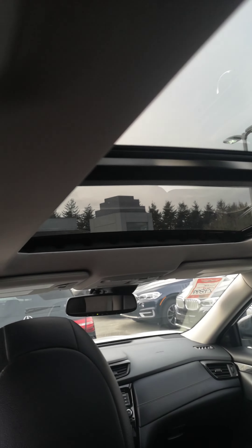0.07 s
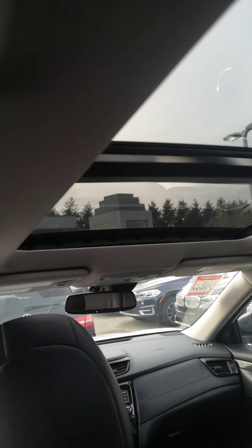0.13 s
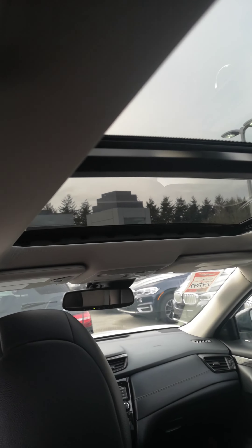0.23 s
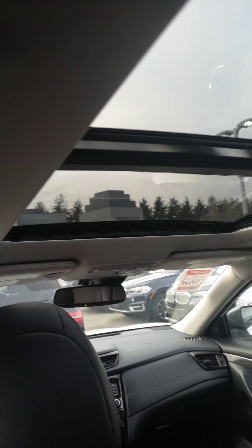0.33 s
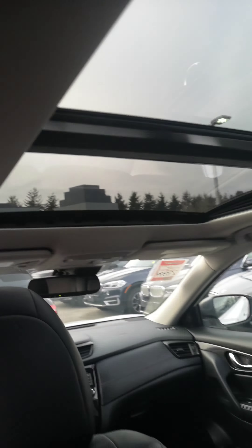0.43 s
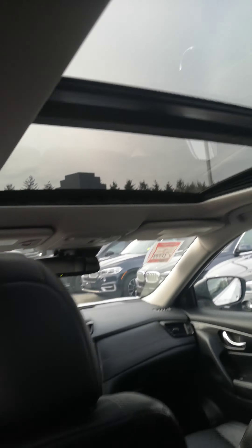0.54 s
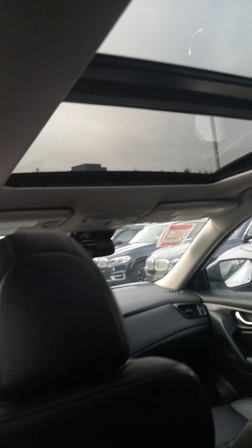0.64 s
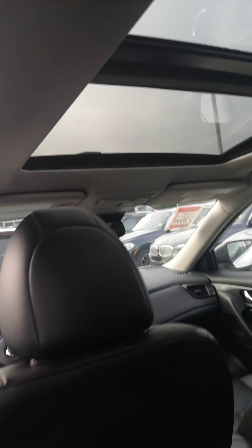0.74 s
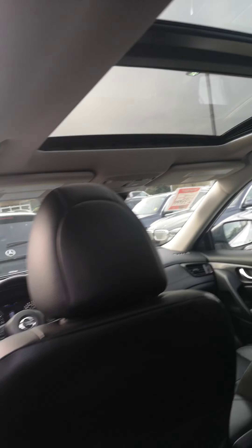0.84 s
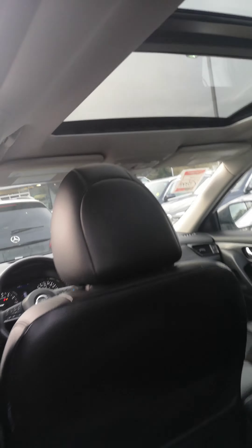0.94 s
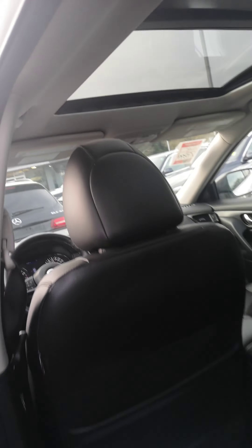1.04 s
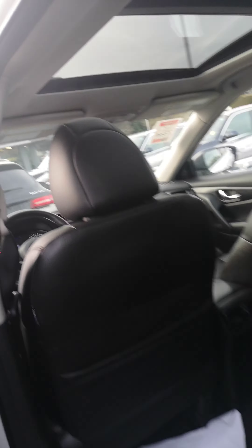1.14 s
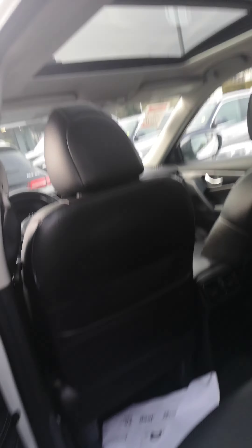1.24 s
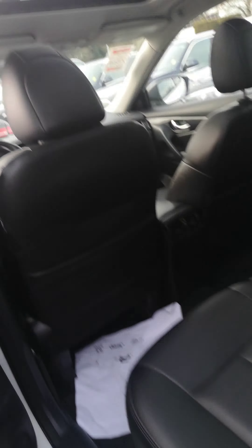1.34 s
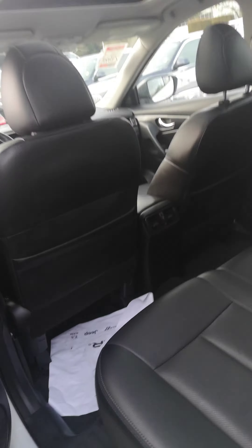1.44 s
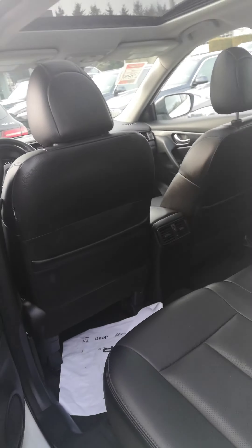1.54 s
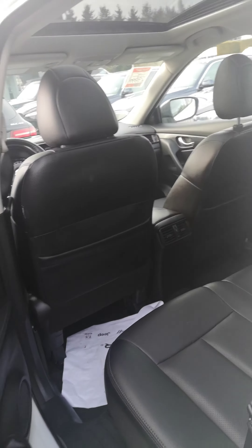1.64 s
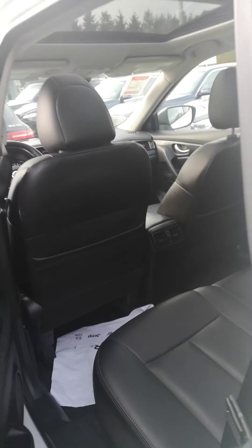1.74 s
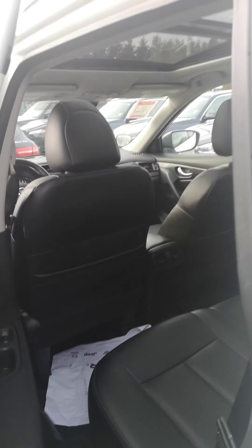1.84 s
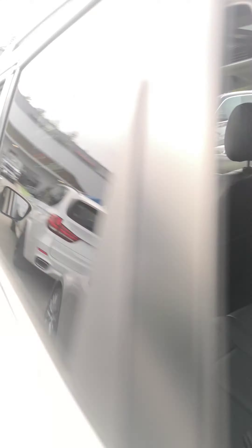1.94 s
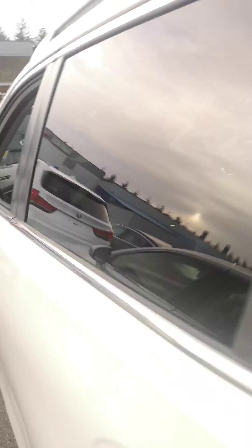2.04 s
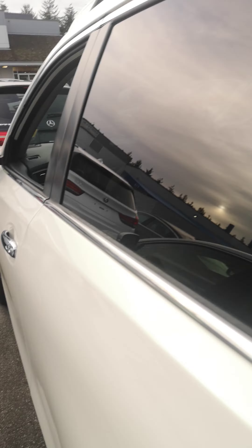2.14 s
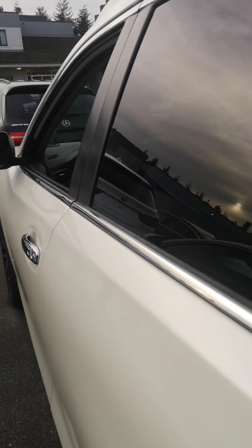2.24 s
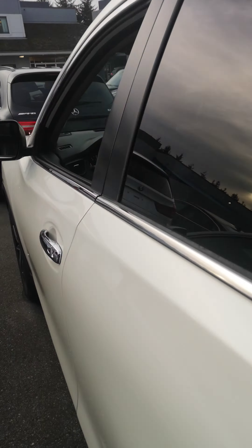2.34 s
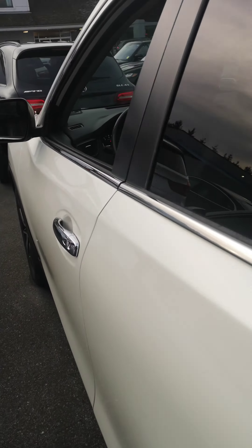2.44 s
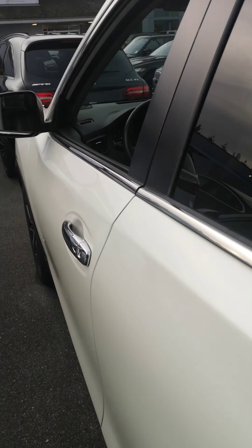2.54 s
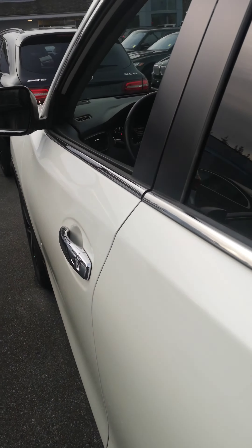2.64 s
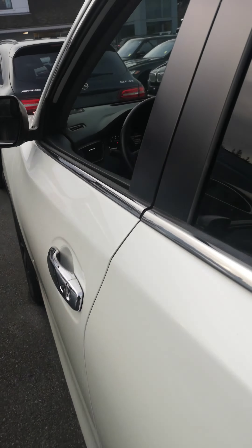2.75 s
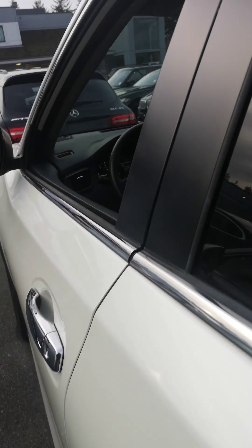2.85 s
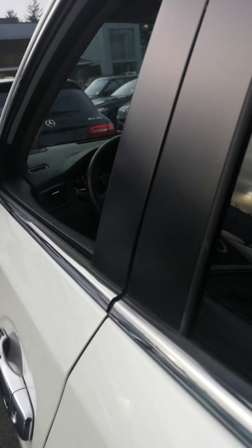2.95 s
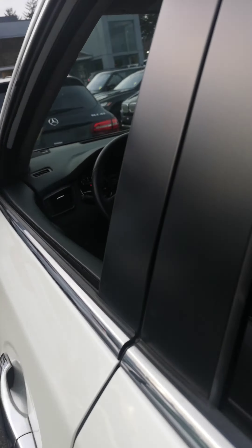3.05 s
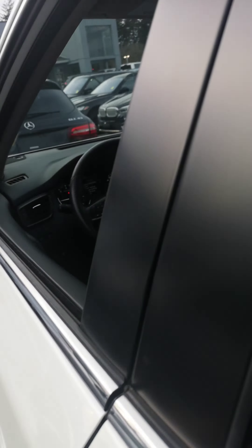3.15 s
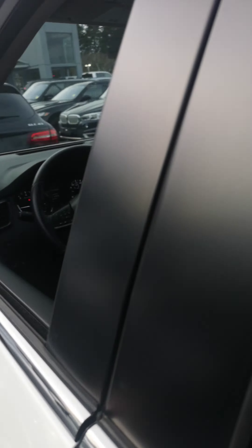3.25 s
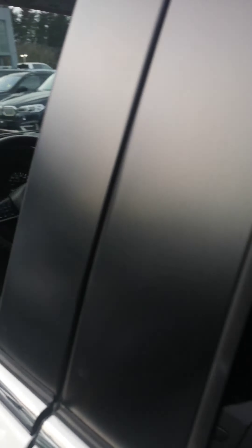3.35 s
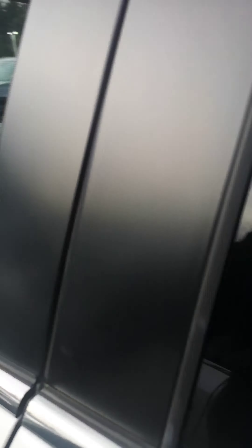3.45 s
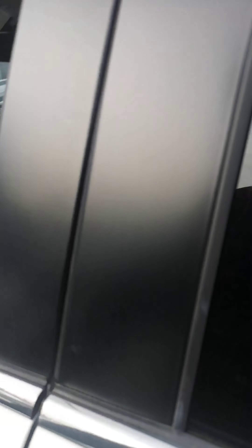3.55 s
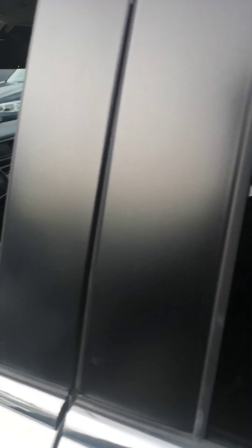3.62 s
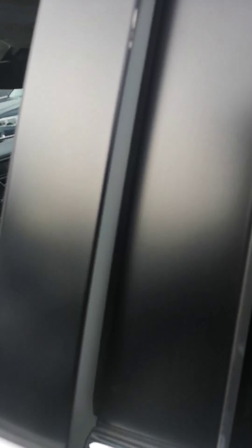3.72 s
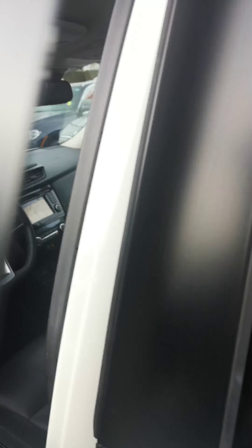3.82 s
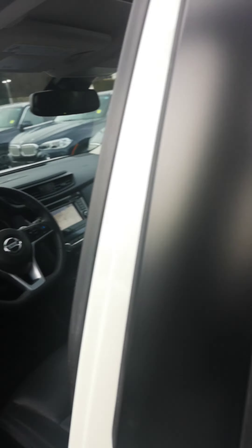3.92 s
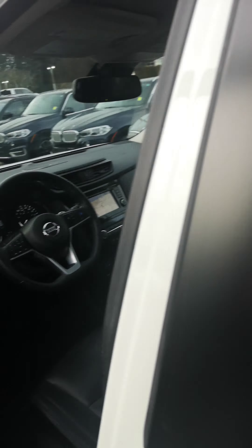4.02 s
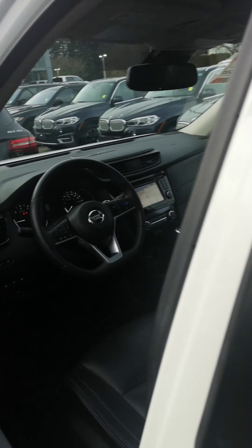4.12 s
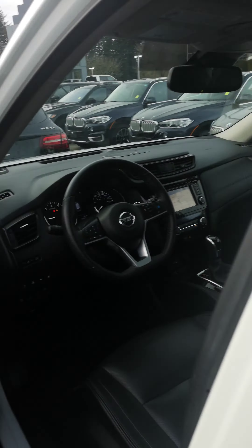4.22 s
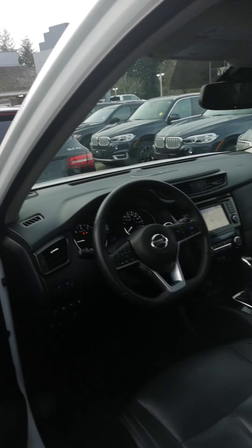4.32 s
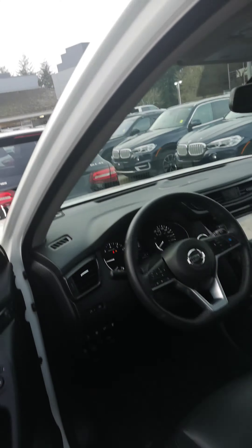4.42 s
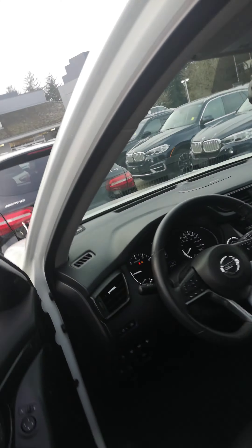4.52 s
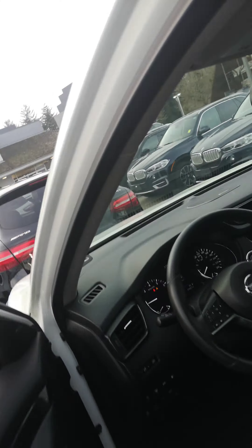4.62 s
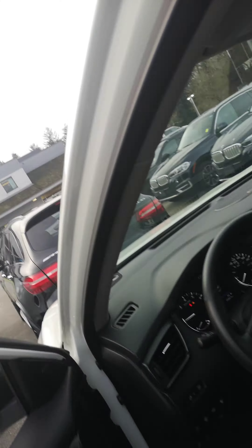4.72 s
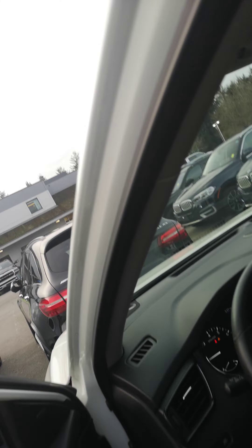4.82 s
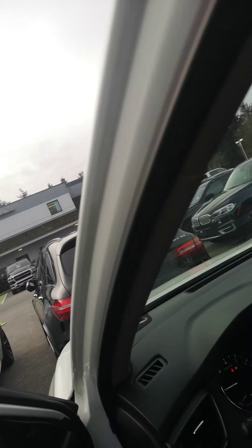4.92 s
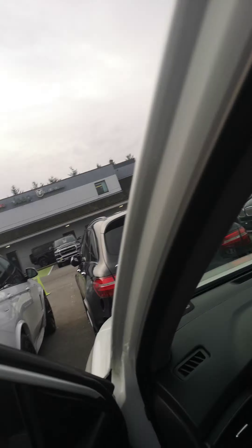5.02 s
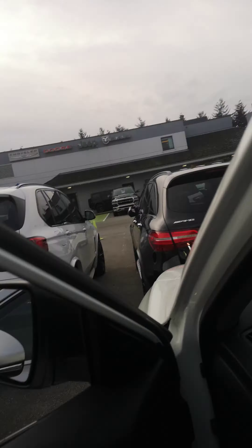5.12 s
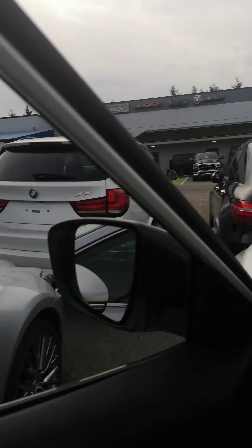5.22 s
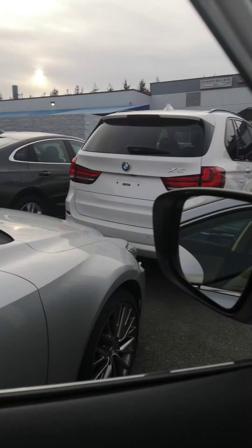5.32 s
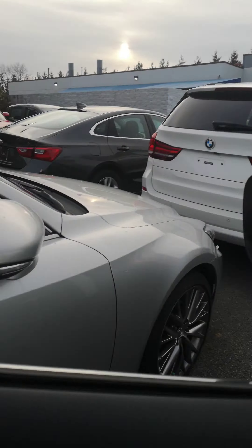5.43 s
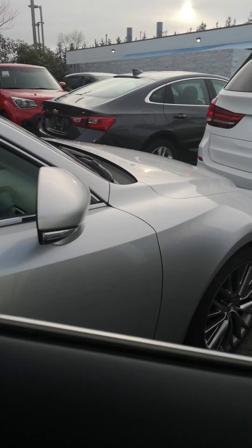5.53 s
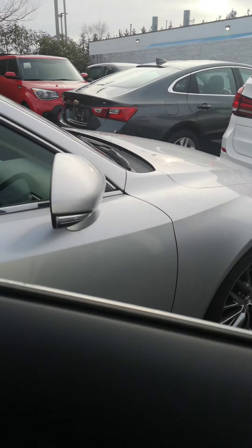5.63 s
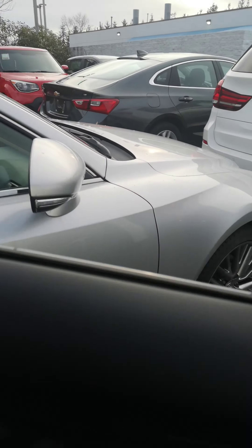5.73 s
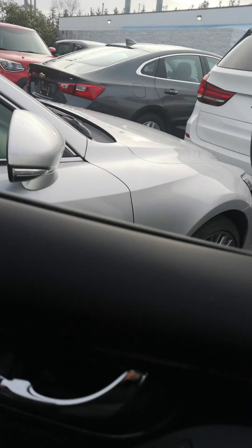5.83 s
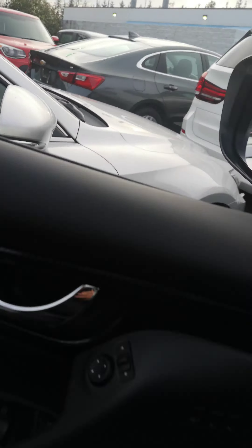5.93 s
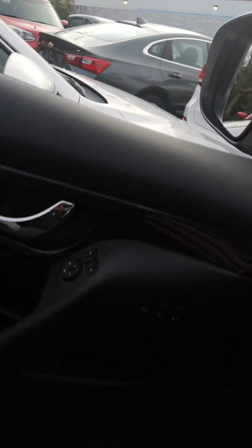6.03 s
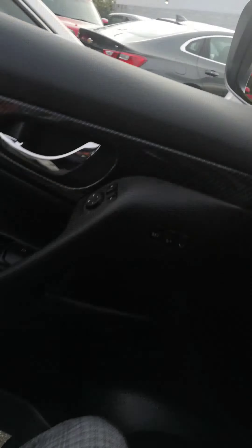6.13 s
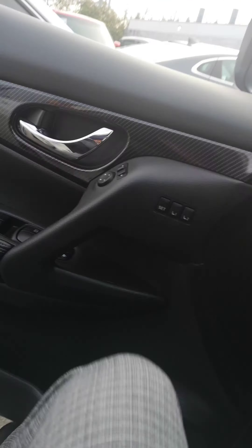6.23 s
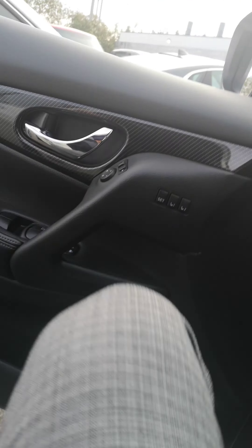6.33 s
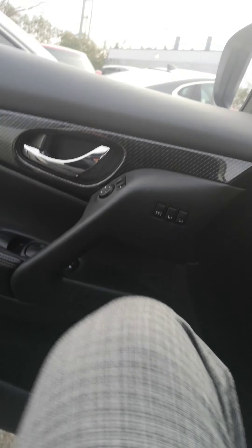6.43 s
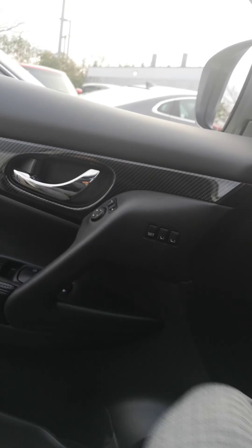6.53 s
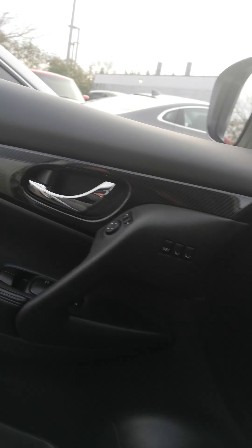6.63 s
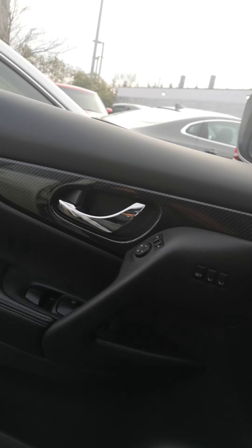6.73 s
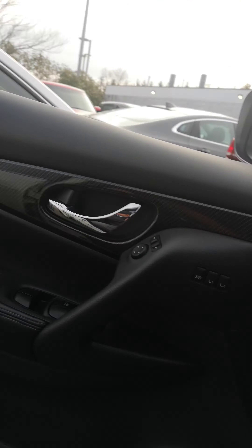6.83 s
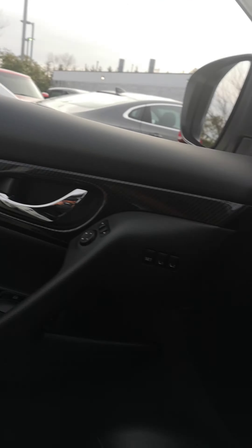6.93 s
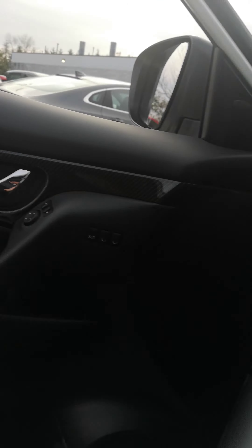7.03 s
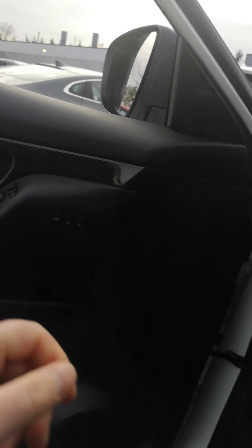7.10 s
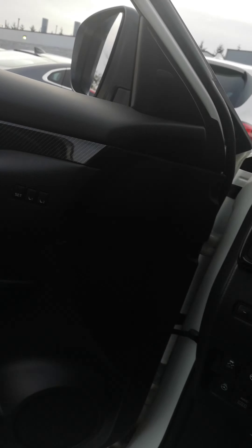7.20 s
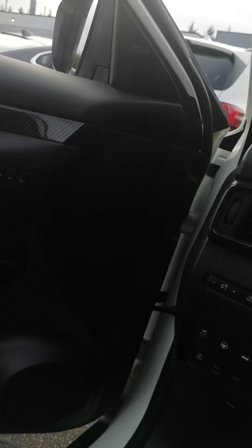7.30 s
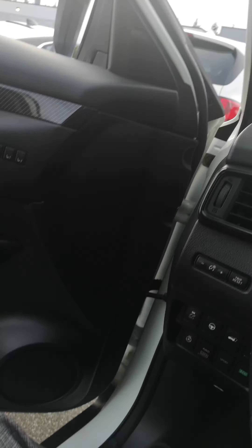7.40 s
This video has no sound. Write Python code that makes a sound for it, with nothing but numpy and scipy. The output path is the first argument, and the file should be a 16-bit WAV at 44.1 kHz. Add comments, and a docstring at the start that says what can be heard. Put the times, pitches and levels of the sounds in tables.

```python
"""Car door slam in a lot

A rear door slams close to the microphone: rows of contacts ring body and latch modes, with seal and clatter noise.
The front door's handle clicks, its latch lets go and the door swings through its stop (struck modes, noise bursts).
Someone slides onto the seat and bumps the trim: rubbed noise, creaking slips, more knocks.
Under it all: wavering engine tones, a fan's fuzzy whine and shaped open-air noise.
"""
import sys
import numpy as np
from scipy import signal
from scipy.fft import rfft, irfft, next_fast_len
from scipy.io import wavfile

SR = 44100
rng = np.random.default_rng(int(sys.argv[2]) if len(sys.argv) > 2 else 0)


def unload_audio(sound):
    """Save the sound as a 16-bit wav file, at the path given as the first command line argument."""
    columns = np.transpose(np.atleast_2d(sound))
    # keep every value between -1 and 1, then stretch to whole-number steps
    steps = np.round(np.clip(columns, -1, 1) * 32767)
    wavfile.write(sys.argv[1], SR, steps.astype(np.int16))


N = 329162
TIME_S = np.arange(N) / SR
AGE_S = TIME_S[:SR]  # time since a blow

# Spectra and mode levels are relative; the sources set the final level.
# open air at the microphone: [time_s, relative_level_db]
LOT_LEVEL = [(0.0, -63.5), (0.39, -66), (1.12, -62.5), (1.35, -59), (1.64, -60.5), (1.97, -60),
             (2.3, -55.5), (2.78, -55.5), (3.37, -57.5), (3.72, -56.5), (3.84, -59), (4.09, -60.5),
             (4.45, -58.5), (4.67, -60.5), (6.63, -60), (6.84, -57.5), (7.46, -59)]
# low rumble of the open air and the rocking car body: [freq_hz, density_db_per_hz]
RUMBLE_SPECTRUM = [(8, -6.5), (25, 2.5), (55, 0), (90, -9), (180, -8.5), (280, -15.5), (420, -19.5),
                   (700, -24), (1100, -25), (2000, -49)]
# high open-air noise: [freq_hz, density_db_per_hz]
HISS_SPECTRUM = [(300, -19), (900, 6), (1200, -2), (1330, 5), (1500, 1.5), (1850, 4.5), (2050, 3),
                 (2400, 4.5), (3300, -1), (4200, 2), (5000, 1), (6100, 1.5), (7050, 7), (7500, -0.5)]

# exhaust throb: [time_s, level_db]
THROB_LEVEL = [(0, -46), (4.6, -41), (7.46, -40)]
# engine tones, louder in an open doorway: [time_s, level_db]
DRONE_LEVEL = [(0, -51.5), (.8, -53.5), (1.8, -43), (2.8, -50), (4.5, -51), (5.6, -53.5), (6.4, -48.5),
               (7.46, -46)]
# engine tones: [pitch_hz, level_db]
DRONE_LINES = [(78, -7.5), (118, -11.5), (156.3, -3.5), (194.3, 0), (236.5, -9)]
# overtones of the drone: [time_s, level_db]
OVERTONE_LEVEL = [(0, -58), (2, -64), (7.46, -59.5)]
# overtones of the drone: [pitch_hz, level_db]
OVERTONE_LINES = [(279, -8), (319, 0), (360, -5)]

# upper whine of the cooling fan: [time_s, pitch_hz]
FAN_PITCH = [(0, 800), (1.5, 821.4), (2.85, 810), (3.4, 822.6), (4.4, 802), (5.6, 787), (7.46, 794)]
# upper whine: [time_s, level_db]
FAN_UPPER_LEVEL = [(0, -64), (1, -69), (1.5, -60.5), (2.1, -67), (2.8, -52.5), (3.5, -57.5), (5.5, -58.5),
                   (6.2, -52.5), (6.8, -64.5)]
# lower whine: [time_s, level_db]
FAN_LOWER_LEVEL = [(0, -69), (5.1, -65), (5.5, -62), (7.46, -58.5)]

# clothes over the seats, a sole over the ground: [start_s, length_s, level_db, centre_hz, width_hz]
RUSTLES = [(1.048, 0.48, -68, 1890, 700), (1.099, .48, -69, 4200, 600), (4.266, 0.19, -62, 5760, 1200),
           (4.459, 0.22, -56.5, 2030, 400), (4.522, .16, -56, 1020, 300), (5.371, 0.058, -57, 1550, 700),
           (5.489, 0.054, -56, 3800, 2500), (5.758, 0.061, -59, 1980, 900), (6.631, .2, -57, 970, 250),
           (6.763, 0.27, -62.5, 1580, 130), (7.312, 0.17, -55.5, 4800, 2500)]
# slip of the seat's upholstery: [freq_hz, density_db_per_hz]
CREAK_SPECTRUM = [(700, -25), (1600, -1.5), (2400, 2), (3200, 2), (3800, -11), (4800, 2), (5600, -13),
                  (7500, -6.5)]
# hard plastic and the catch: [start_s, level_db, centre_hz]
CLICKS = [(1.616, -47, 5200), (2.982, -41, 6000), (3.024, -38.5, 6040), (3.735, -31, 6900),
          (3.767, -34, 2970), (5.505, -48, 3800), (6.735, -43.5, 3200), (7.23, -41, 2300),
          (7.2653, -38, 1600)]

# latch, door stop, shoes and trim: [start_s, ring_db, ring_hz, thud_db, snap_db]
KNOCKS = [(1.4722, -43.5, 700, -46, -48), (3.647, -38, 330, -38, -41), (3.7209, -35, 250, -21.5, -32.5),
          (3.729, -23, 226, -28, -45), (3.7318, -18, 575, -28, -29), (3.741, -24.5, 155, -35, -37),
          (3.758, -28.5, 80, -45, -57), (4.105, -50, 200, -46, -40.5), (4.1235, -44, 1200, -46, -42),
          (4.127, -30, 980, -34, -25.5), (4.129, -27, 407, -38, -31), (4.14, -25.5, 182, -44, -37),
          (4.405, -44, 292, -40, -62), (4.641, -39.5, 490, -46, -60), (5.03, -53, 472, -43, -62),
          (5.378, -42, 507, -44, -53), (6.6345, -20.5, 135, -27, -39.5), (6.638, -24.5, 336, -36, -60),
          (6.662, -34.5, 392, -40, -60), (6.686, -39, 634, -44, -64), (6.705, -27, 135, -32.5, -41),
          (6.731, -21.5, 118, -40, -50), (6.762, -29, 280, -36, -51), (6.7817, -33.5, 330, -31.5, -37),
          (7.146, -28, 138, -39, -60), (7.229, -34, 187, -38, -37.5), (7.2642, -34.5, 338, -42, -44),
          (7.298, -33, 183, -37.5, -50)]
# padded contact: [freq_hz, density_db_per_hz]
THUD_SPECTRUM = [(30, -21), (100, 11.5), (300, 3.5), (600, -3), (1000, -11), (1600, -43.5), (3000, -32),
                 (7000, -28)]
# hard contact: [freq_hz, density_db_per_hz]
SNAP_SPECTRUM = [(100, -10), (600, -27.5), (1200, 5.5), (2000, 2.5), (3500, -5), (5500, -3), (7200, -1.5)]
# front door rattling on after its latch and its stop: [start_s, level_db]
SHAKES = [(3.735, -31), (4.13, -37)]
# rattling front door: [freq_hz, density_db_per_hz]
SHAKE_SPECTRUM = [(40, -10), (180, 9), (300, 0), (600, 3.5), (1000, -1), (1500, -16), (3000, -18.5),
                  (7200, -24)]

# handle at its stop: [pitch_hz, level_db, t60_s]
HANDLE_MODES = [(3840, -18, 0.011), (6760, -24, 0.011)]
# handle spring, pulled and let go: [loudest_tick_s, level_db, spread_s]
CHATTER = [(3.6205, -34.5, 0.0055), (3.641, -41, 0.02), (3.8393, -34.5, 0.015)]
# resonances of the spring: [centre_hz, width_hz, level_db]
SPRING_BANDS = [(2400, 1200, -8), (4500, 700, -1), (7040, 1100, -7)]

# contacts of seal, latch and rattling trim: [start_s, push_db, clatter_db, clatter_t60_s]
SLAM_CONTACTS = [(2.1186, -36, -17.5, 0.044), (2.1242, -13.5, -9.5, 0.063), (2.1287, -6, -13, 0.063),
                 (2.1402, -31.5, -25.5, 0.054), (2.1448, -14, -12.5, 0.03), (2.1511, -10, -10, 0.053),
                 (2.1808, -20, -27.5, 0.069), (2.2085, -22.5, -35, 0.074), (2.293, -39, -67, .05)]
# door and body shell: [pitch_hz, level_db, t60_s]
DOOR_MODES = [(61.1, -5, 0.41), (87.4, -3.5, 0.26), (98, -3, 0.26), (129.8, -8, 0.23), (175.3, -3, 0.13),
              (204.3, -6, 0.27), (290.8, -11, 0.36), (345, -17, 0.25), (377, -8.5, .13), (457, -15, 0.14),
              (511, -12, 0.092), (550, -28, 0.042), (642, -20, 0.097), (870, -18.5, 0.13),
              (975, -17.5, .09)]
# steel of latch and striker: [pitch_hz, level_db, t60_s]
LATCH_MODES = [(1106, -24, 0.073), (2380, -20, 0.052), (2630, -13.5, 0.044), (4190, -16, 0.047),
               (5660, -29, .06), (7000, -15, 0.054)]
# clatter of the contacts: [freq_hz, density_db_per_hz]
CLATTER_SPECTRUM = [(60, -21), (250, 13.5), (600, 8.5), (1000, 5), (1400, 0), (1900, -2), (2700, 0.5),
                    (3300, -4), (4200, -3), (5500, -2.5), (7100, -2.5), (7800, -11)]
# first slap of the rubber seal: [freq_hz, density_db_per_hz]
SEAL_SPECTRUM = [(150, -32.5), (400, -19), (550, 11), (1150, 6), (1600, -15), (3000, -19), (7000, -33)]
# dense panel modes: [freq_hz, density_db_per_hz]
PANEL_SPECTRUM = [(20, -14), (60, -0.5), (180, -1.5), (260, 0), (400, -13), (700, -27), (1500, -16.5),
                  (7000, -46)]
# decay of the panel modes: [freq_hz, t60_s]
PANEL_DECAY = [(50, 0.84), (200, 0.57), (500, 0.17), (1500, 0.17), (7000, .16)]


def amp(db):
    """Decibels to gain."""
    return 10 ** (np.asarray(db) / 20)


def unit(x):
    """Scales to rms 1."""
    return x / np.sqrt(np.mean(x ** 2) + 1e-20)


def read(points, hz):
    """Interpolates a frequency table on a log axis."""
    table_hz, value = np.transpose(points)
    return np.interp(np.log(hz + 1), np.log(table_hz + 1), value)


def curve(rows):
    """Interpolates a timed table at every sample."""
    return np.interp(TIME_S, *np.transpose(rows))


def add(mix, start_s, sound):
    """Mixes a sound in at its start time."""
    part = mix[round(start_s * SR):][:len(sound)]
    part += sound[:len(part)]


def noise(spectrum, size=SR):
    """Noise of rms 1 with the given spectrum."""
    white = rfft(rng.standard_normal(size))
    gain = amp(read(spectrum, np.fft.rfftfreq(size, 1 / SR)))
    return unit(irfft(white * gain, size))


def band(centre_hz, width_hz, size=SR):
    """Noise of rms 1 in one resonance; centred on 0 Hz, a slow random wander."""
    padded = next_fast_len(size, True)
    hz = np.fft.rfftfreq(padded, 1 / SR)
    white = rfft(rng.standard_normal(padded))
    resonance = 1 / (1 + ((hz - centre_hz) / width_hz * 1.362) ** 2)
    return unit(irfft(white * resonance, padded)[:size])


def fade(age_s, t60_s):
    """Exponential decay, 60 dB in t60_s."""
    return np.exp(-np.log(1000) * age_s / t60_s)


def dying(t60_s, rise_s=0.00045):
    """A quick rise and an exponential decay."""
    return (1 - np.exp(-AGE_S / rise_s)) * fade(AGE_S, t60_s)


def ring(hz, t60_s):
    """One struck mode: a decaying sine."""
    return np.sin(2 * np.pi * hz * AGE_S) * dying(t60_s)


def ring_modes(modes):
    """Modes struck together."""
    return sum(amp(db) * ring(hz, t60_s) for hz, db, t60_s in modes)


def tones(lines, wander_hz, flutter_db):
    """Lines that waver in pitch and level, rms 1."""
    out = 0
    for hz, db in lines:
        turns = np.cumsum(hz + wander_hz * band(0, 5.14, N)) / SR
        gain = amp(db + flutter_db * band(0, 2, N))
        out = out + gain * np.sin(2 * np.pi * turns)
    return unit(out)


def lot(swell_db=1.0, hiss_db=5.0, rumble_db=-47, rumble_share=0.32):
    """Distant traffic and air, louder outside the cabin, which shuts out less rumble than hiss."""
    air_db = curve(LOT_LEVEL)
    swell = amp(swell_db * band(0, 13, N))
    rumble_level_db = rumble_db + rumble_share * (air_db - air_db.mean())
    rumble = amp(rumble_level_db) * noise(RUMBLE_SPECTRUM, N)
    hiss = amp(hiss_db + air_db) * noise(HISS_SPECTRUM, N)
    return swell * (rumble + hiss)


def idle(throb_hz=38.3, throb_wander_hz=0.22):
    """The engine idles: an exhaust throb under wavering tones."""
    turns = np.cumsum(throb_hz + throb_wander_hz * band(0, 3.1, N)) / SR
    throb = unit(np.sin(2 * np.pi * turns))
    drone = tones(DRONE_LINES, wander_hz=1.313, flutter_db=3.0)
    overtones = tones(OVERTONE_LINES, wander_hz=2.504, flutter_db=3.0)
    engine_tones = amp(curve(DRONE_LEVEL)) * drone + amp(curve(OVERTONE_LEVEL)) * overtones
    return amp(curve(THROB_LEVEL)) * throb + engine_tones


def fan(lower_hz=510, lower_width_hz=25, core_width_hz=12, skirt_width_hz=65, skirt_db=1):
    """Two fuzzy whistles; the upper has a narrow core in a wider skirt and drifts with the fan's speed."""
    def fuzz():
        return band(0, core_width_hz, N) + amp(skirt_db) * band(0, skirt_width_hz, N)

    carrier = np.exp(2j * np.pi * np.cumsum(curve(FAN_PITCH)) / SR)
    upper = unit(((fuzz() + 1j * fuzz()) * carrier).real)
    lower = band(lower_hz, lower_width_hz, N)
    return amp(curve(FAN_UPPER_LEVEL)) * upper + amp(curve(FAN_LOWER_LEVEL)) * lower


def rustles(grain_db=2, grain_width_hz=90):
    """The surface catches and slips unevenly under a smooth stroke."""
    out = np.zeros(N)
    for start_s, length_s, db, hz, width_hz in RUSTLES:
        stroke = signal.windows.tukey(int(length_s * SR), 0.7)
        grain = amp(grain_db * band(0, grain_width_hz))
        rub = unit(band(hz, width_hz) * grain)
        add(out, start_s, amp(db) * stroke * rub[:len(stroke)])
    return out


def creak(start_s=6.0315, count=8, gap_s=0.0148, loudest_db=-32.5, peak_s=0.03, fall_db_per_s=95,
          slip_t60_s=0.0067, tail_db=-22, tail_t60_s=0.12):
    """Upholstery sticks and slips: an even run of sharp ticks with a short cabin tail."""
    out = np.zeros(N)
    tick = dying(slip_t60_s) + amp(tail_db) * dying(tail_t60_s)
    for delay_s in gap_s * np.arange(count):
        db = loudest_db - fall_db_per_s * abs(delay_s - peak_s)
        add(out, start_s + delay_s, amp(db) * noise(CREAK_SPECTRUM) * tick)
    return out


def clicks(width_share=0.48, t60_s=0.02):
    """Small parts ring briefly in one band, its width a share of its pitch."""
    out = np.zeros(N)
    for start_s, db, hz in CLICKS:
        add(out, start_s, amp(db) * band(hz, width_share * hz) * dying(t60_s))
    return out


def knocks(ring_t60_s=0.084, ring_ref_hz=200, ring_fall=0.65,
           thud_t60_s=0.086, snap_t60_s=0.049, shake_t60_s=0.28):
    """Each knock rings one panel, with a padded thud and a hard snap; the front door rattles on after two."""
    out = np.zeros(N)
    for start_s, ring_db, hz, thud_db, snap_db in KNOCKS:
        t60_s = ring_t60_s * (ring_ref_hz / hz) ** ring_fall  # higher rings die sooner
        panel = amp(ring_db) * ring(hz, t60_s)
        thud = amp(thud_db) * noise(THUD_SPECTRUM) * dying(thud_t60_s, rise_s=0.0013)
        snap = amp(snap_db) * noise(SNAP_SPECTRUM) * dying(snap_t60_s)
        add(out, start_s, panel + thud + snap)
    for start_s, db in SHAKES:
        add(out, start_s, amp(db) * noise(SHAKE_SPECTRUM) * dying(shake_t60_s, rise_s=0.004))
    return out


def handle(stop_s=3.5476, snap_db=-29, snap_t60_s=0.016,
           ticks_per_side=3, tick_gap_s=0.0074, tick_t60_s=0.017, jitter_s=0.0007):
    """One bright click at the stop, then the spring ticks in short runs that swell and fade."""
    out = np.zeros(N)
    snap = amp(snap_db) * noise(SNAP_SPECTRUM) * dying(snap_t60_s)
    add(out, stop_s, snap + ring_modes(HANDLE_MODES))
    for loudest_s, db, spread_s in CHATTER:
        for delay_s in tick_gap_s * np.arange(-ticks_per_side, ticks_per_side + 1):
            spring = sum(amp(band_db) * band(hz, width_hz) for hz, width_hz, band_db in SPRING_BANDS)
            gain = amp(db) * np.exp(-abs(delay_s) / spread_s)
            add(out, loudest_s + delay_s + rng.normal(0, jitter_s), gain * spring * dying(tick_t60_s))
    return out


def slam_rumble(start_s=2.17, level_db=-38, t60_s=0.7):
    """The car body rocks on after the slam as a low rumble."""
    out = np.zeros(N)
    add(out, start_s, amp(level_db) * noise(RUMBLE_SPECTRUM) * dying(t60_s, rise_s=0.03))
    return out


def panel_wash():
    """Dense modes of sheet metal and cabin: the bass lasts longest."""
    hz, age_s, bins = signal.stft(noise(PANEL_SPECTRUM), SR, nperseg=512)
    t60_s = read(PANEL_DECAY, hz)[:, None]
    wash = signal.istft(bins * fade(age_s, t60_s), SR, nperseg=512)[1][:SR]
    return wash * (1 - np.exp(-AGE_S / 0.0023))


def slam(swing_db=-30, seal_db=-18.0, seal_t60_s=0.21, thump_db=6, thump_hz=115, thump_t60_s=0.035,
         cabin_db=2, cabin_hz=28.5, cabin_t60_s=0.28, wash_db=-18):
    """The door pushes air ahead, meets its seal, latches, and pumps the cabin like a drum."""
    out = np.zeros(N)
    # air squeezed from the closing gap
    draught = np.interp(AGE_S, [0, 0.14, 0.22, 0.26], [0, 0.28, 0.16, 0])
    add(out, 1.9, amp(swing_db) * band(35, 18) * draught)
    add(out, 2.1105, amp(seal_db) * noise(SEAL_SPECTRUM) * dying(seal_t60_s, rise_s=0.00087))
    # the whole skin gives a short, low thump at each contact
    thump = amp(thump_db) * ring(thump_hz, thump_t60_s)
    push = thump + ring_modes(DOOR_MODES)
    steel = ring_modes(LATCH_MODES)
    for start_s, push_db, clatter_db, t60_s in SLAM_CONTACTS:
        clatter = noise(CLATTER_SPECTRUM) * dying(t60_s) + steel
        add(out, start_s, amp(push_db) * push + amp(clatter_db) * clatter)
    add(out, 2.126, amp(wash_db) * panel_wash())
    # trapped air bounces back, suction first
    add(out, 2.131, -amp(cabin_db) * ring(cabin_hz, cabin_t60_s))
    return out


def scene():
    """All sources at one microphone."""
    background = lot() + idle() + fan()
    small_sounds = rustles() + creak() + clicks() + knocks() + handle()
    return (background + small_sounds + slam_rumble() + slam())[None]


def record(dry, ceiling=1.0, edge_hz=7630):
    """The slam overloads the microphone with a firm knee; then a low-pass limits the band."""
    squashed = dry / (1 + (dry / ceiling) ** 4) ** 0.25
    lowpass = signal.firwin(201, edge_hz, window=("kaiser", 6), fs=SR)
    return signal.oaconvolve(squashed, lowpass[None], "same")


dry = scene()
out = record(dry)
unload_audio(out)
```